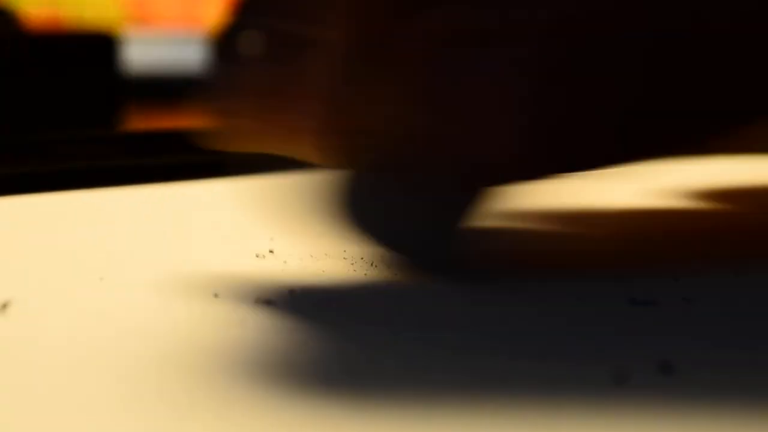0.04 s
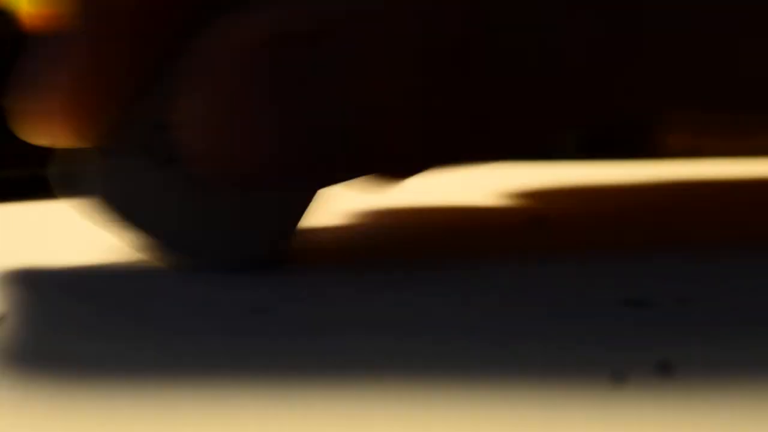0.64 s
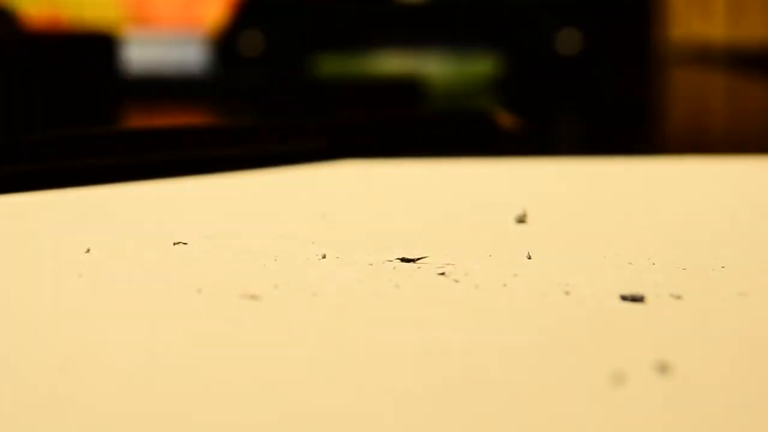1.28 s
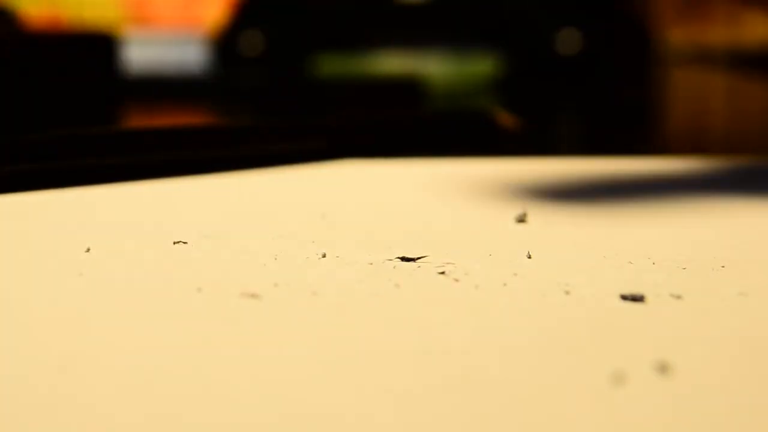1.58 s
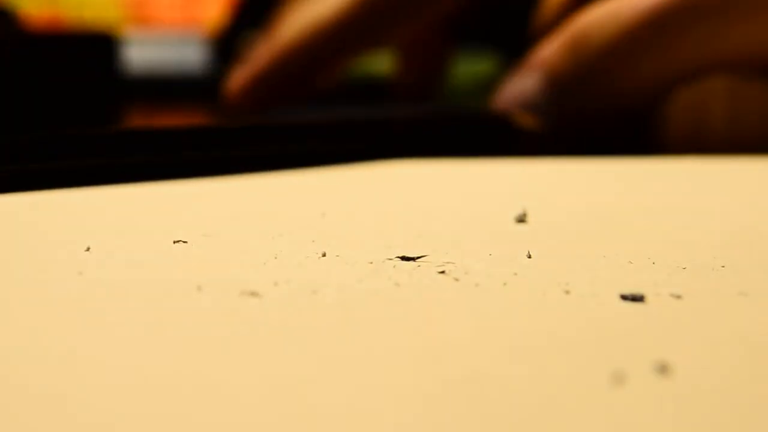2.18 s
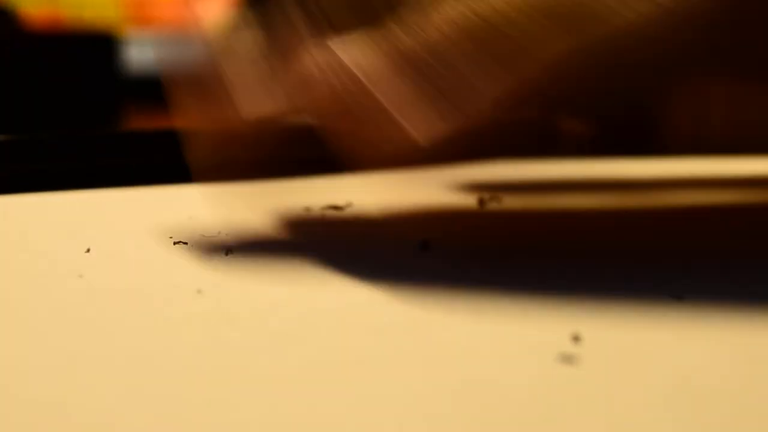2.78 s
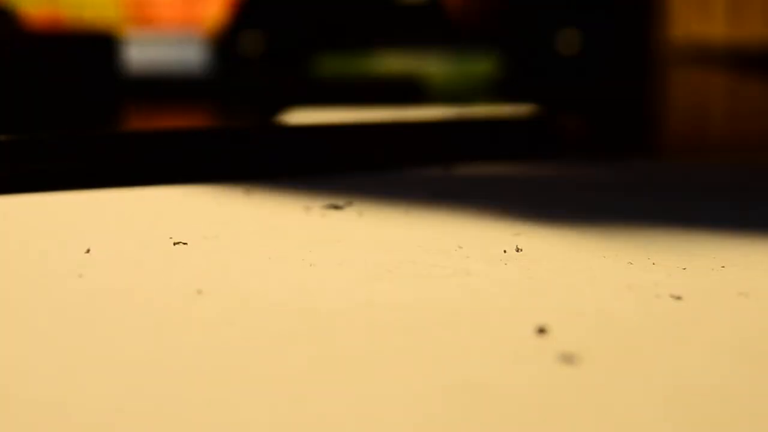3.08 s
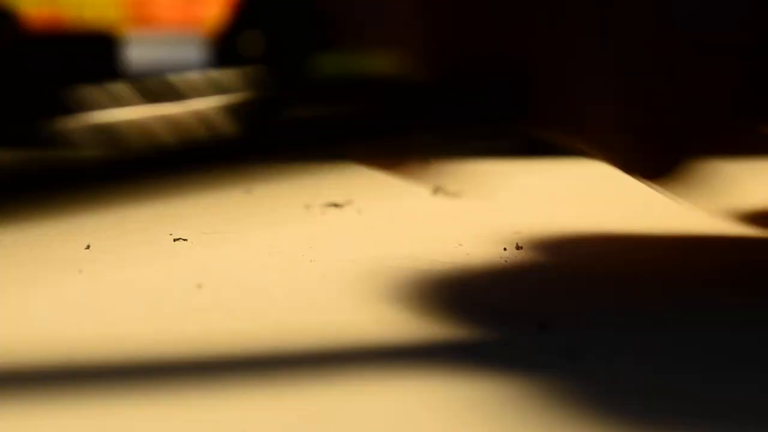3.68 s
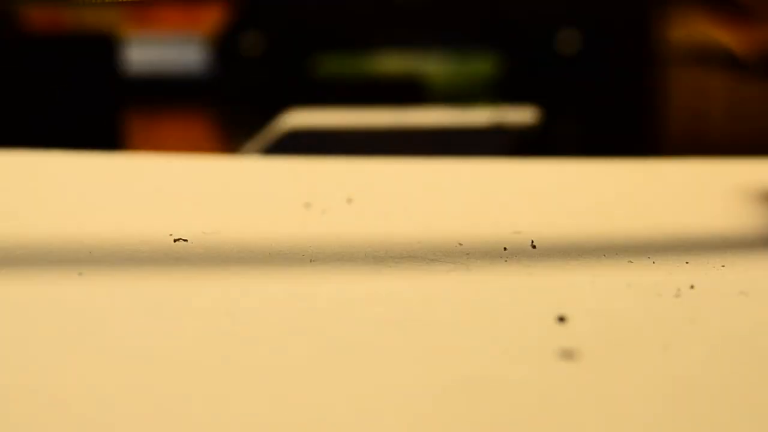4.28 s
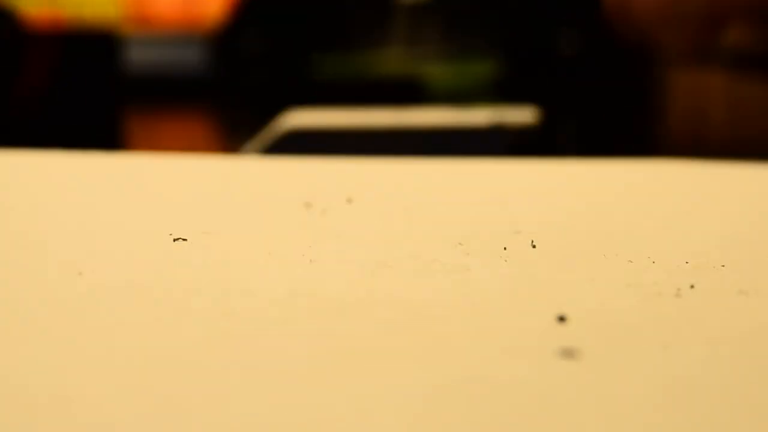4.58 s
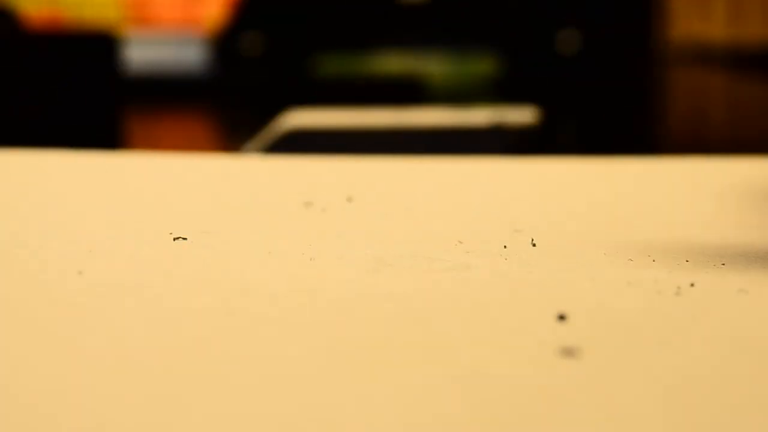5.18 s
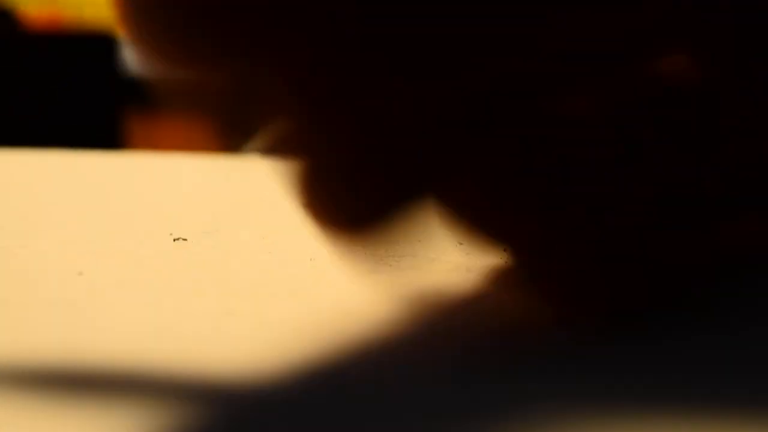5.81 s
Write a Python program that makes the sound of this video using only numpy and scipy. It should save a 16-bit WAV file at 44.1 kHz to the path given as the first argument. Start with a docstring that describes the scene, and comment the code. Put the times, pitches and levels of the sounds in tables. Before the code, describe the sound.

An eraser rubs paper and knocks down on a desk, a hand brushes the sheet, and a pencil scrapes and taps over a low hum.

```python
"""An eraser rubs a drawing pad, paper fibres snapping under it, and is put down with a knock on the desk.
A hand sweeps the crumbs away. A pencil rings faintly as it is lifted, scrapes over the paper
and drops in light taps that ring its wooden barrel. The stereo microphone lies close to the pad;
behind it all, a fan and a mains hum drone in the small furnished room."""
import sys
import numpy as np
from scipy import signal
from scipy.fft import rfft, irfft
from scipy.io import wavfile

SR = 44100
rng = np.random.default_rng(int(sys.argv[2]) if len(sys.argv) > 2 else 0)


def transcribe(signal):
    """Save signal, clipped to [-1, 1], as a 16-bit WAV file at the path in sys.argv[1]."""
    frames = np.atleast_2d(signal).T
    limited = np.clip(frames, -1, 1)
    pcm = np.round(limited * 32767).astype(np.int16)
    wavfile.write(sys.argv[1], SR, pcm)


N = 257984
TIME_S, BIN_HZ = np.arange(N) / SR, np.fft.rfftfreq(N, 1 / SR)


def gain_of(db):
    return 10 ** (np.asarray(db) / 20)


def unit_rms(x):
    return x / np.sqrt(np.mean(x ** 2) + 1e-20)


def curve_at(points, hz):
    """Join points by straight lines on a log frequency axis."""
    point_hz, values = np.transpose(points)
    return np.interp(np.log(hz + 1), np.log(point_hz + 1), values)


def add(mix, start_s, sound):
    part = mix[max(round(start_s * SR), 0):][:len(sound)]
    part += sound[:len(part)]


def coloured(x, spectrum):
    return irfft(rfft(x) * gain_of(curve_at(spectrum, BIN_HZ)), N)


def band(x, low_hz, high_hz):
    return irfft(rfft(x) * ((BIN_HZ >= low_hz) & (BIN_HZ < high_hz)), N)


def wander(rate_hz):
    """Random drift of rms 1."""
    return unit_rms(band(rng.standard_normal(N), 0.1, rate_hz))


def struck(modes, contact_hz, spread_s=0):
    """Ring of a struck body; a soft contact leaves the upper resonances unexcited."""
    ring_samples = 4096
    hz = np.fft.rfftfreq(2 * ring_samples, 1 / SR)
    power = sum(gain_of(db) ** 2 / (1 + ((hz - pitch) / width) ** 2) ** 2 for pitch, width, db in modes)
    power /= 1 + (hz / contact_hz) ** 4
    log_gain = np.log(power + 1e-9) / 2
    mirrored = np.concatenate([log_gain, log_gain[-2:0:-1]])
    causal_ring = np.exp(np.conj(signal.hilbert(mirrored)))[:len(hz)]
    # bending waves carry the treble faster than the bass; spread_s is the travel time at 1 kHz
    travel = np.exp(-4j * np.pi * spread_s * np.sqrt(1000 * hz))
    return irfft(causal_ring * travel)[:ring_samples]


# the room's decay: frequency_hz, t60_s
ROOM_DECAY = [(100, 0.21), (400, 0.17), (1000, 0.34), (3000, .24), (9000, 0.28), (16000, 0.095)]
# colour of its tail: frequency_hz, level_db
ROOM_COLOUR = [(100, -15.5), (450, 0), (1000, -15), (3000, -12.5), (9000, -10.5), (16000, -14)]
def room(x):
    """Diffuse tail of a small furnished room, each band dying at its own speed."""
    t = np.arange(SR // 2) / SR
    reflections = rng.standard_normal(len(t)) * np.clip((t - 0.003) / 0.0014, 0, 1)
    hz, age_s, bands = signal.stft(reflections, SR, nperseg=256)
    decay_rate = np.log(1000) / curve_at(ROOM_DECAY, hz)[:, None]
    bands *= np.exp(-decay_rate * age_s) * np.sqrt(2 * decay_rate / SR)
    bands *= gain_of(curve_at(ROOM_COLOUR, hz))[:, None]
    tail = signal.istft(bands, SR, nperseg=256)[1]
    return signal.fftconvolve(x, tail)[:N]


# echoes off things on the desk: delay_s, level_db
DESK_ECHOES = [(.0024, -17), (.0052, -20), (.0076, -15.5), (.0086, -17.5)]
def at_microphone(x, room_db):
    """The direct sound arrives with its first echoes and the room's tail."""
    heard = x + gain_of(room_db) * room(x)
    for delay_s, db in DESK_ECHOES:
        add(heard, delay_s, gain_of(db) * x)
    return heard


def tone(hz, db, waver):
    """A drone tone that wavers in level and phase."""
    phase = 2 * np.pi * hz * TIME_S + waver * wander(5)
    return np.sqrt(2) * gain_of(db + 1.7 * waver * wander(8)) * np.sin(phase)


# the fan's rush of air: frequency_hz, level_db
FAN_AIR = [(25, -13), (50, -8.5), (66, -14), (110, 0), (185, 2.5), (240, -9.5), (340, -1), (420, -6.5),
           (540, -4.5), (700, -10), (1300, -11.5), (3000, -21), (6000, -30), (16000, -33)]
# how much that rush differs between the two capsules: frequency_hz, side_db
AIR_WIDTH = [(60, -12), (130, -28.5), (290, -14), (640, -9), (1410, -5.5), (3100, -2), (6820, -4),
             (15000, -1.5)]
# the mains tone, then the fan's tones: pitch_hz, level_db
DRONE_TONES = [(120, -49.5), (181, -63.5), (193, -62), (343, -67), (1271, -78.5), (1352, -86), (1535, -78),
               (1561, -82)]
def fan_and_mains():
    """Air rushes from all round the room; hum, fan tones and a faint whine sit in the centre."""
    mid, side = (gain_of(-55 + 0.88 * wander(5.7)) * unit_rms(coloured(noise, FAN_AIR))
                 for noise in rng.standard_normal((2, N)))
    side = coloured(side, AIR_WIDTH)
    for k, (hz, db) in enumerate(DRONE_TONES):
        mid += tone(hz, db, waver=1.1 if k else 0.16)  # the mains is steadier than the fan
    whine_db = np.interp(TIME_S, [0, 3.0, 3.6], [-70, -67.5, -73.5])
    mid += tone(hz=1166, db=whine_db, waver=1.7)
    return np.array([mid + side, mid - side])


# small sharp clicks: start_s, level_db, pitch_hz, width_hz, room_send_db
CLICKS = [(0.1368, -12, 4300, 2040, 4), (2.1362, -10, 3800, 202, 8), (2.1595, -16, 8500, 5000, -22),
          (2.4947, -31.5, 6000, 7000, -11), (2.7975, -28, 4880, 6000, -6), (3.6735, -1, 8100, 1900, -12),
          (4.3334, -21.5, 7700, 7150, -5), (4.388, -24, 4000, 4000, -3), (4.864, -29, 10200, 3000, 9)]
def clicks():
    """Tiny hard contacts, some dry and close to the microphone, some further off."""
    near, far = np.zeros((2, N))
    for start_s, db, hz, width_hz, send_db in CLICKS:
        click = gain_of(db) * struck([(hz, width_hz, 0)], contact_hz=10000)
        add(near, start_s, click)
        add(far, start_s, gain_of(send_db) * click)
    return at_microphone(near, room_db=-4.5) + gain_of(4) * room(far)


# scrapes, squeaks and the lifted pencil's ring: middle_s, length_s, level_db, pitch_hz, width_hz
SWELLS = [(0.141, 0.022, -48, 3900, 1520), (0.656, 0.037, -48, 1780, 500), (0.66, 0.064, -59, 640, 270),
          (2.109, 0.02, -48.5, 1210, 450), (3.298, 0.058, -49.5, 3200, 320), (3.33, 0.15, -53, 3920, 504),
          (3.701, 0.078, -50, 1430, 250), (3.93, 0.66, -54, 890, 350), (4.052, 0.037, -45, 620, 400),
          (4.041, 0.074, -38.5, 3330, 2000), (4.061, 0.032, -40, 1270, 550),
          (4.469, 0.084, -35, 4000, 1420), (4.868, 0.059, -64.5, 4200, 250), (4.87, .04, -63, 10200, 1400)]
def resonant_swells(pulses_per_s=2500):
    """Each short swell is a stream of irregular little pulses ringing one resonance."""
    mix = np.zeros(N)
    for middle_s, length_s, db, hz, width_hz in SWELLS:
        swell = np.cos(np.pi * np.clip((TIME_S - middle_s) / length_s, -0.5, 0.5)) ** 2
        pulses = rng.standard_normal(N) * (rng.random(N) < pulses_per_s / SR)
        ring = signal.oaconvolve(pulses, struck([(hz, width_hz, 0)], contact_hz=14500))[:N]
        mix += gain_of(db) * unit_rms(ring) * swell
    return mix


# resonances of the pencil and of the pad under it: pitch_hz, width_hz, level_db
PENCIL_MODES = [(596, 180, -10.5), (1300, 78, 3), (1505, 88, 1), (1820, 78, 0.5), (2170, 110, -9),
                (2900, 280, -6), (3430, 110, -8.5), (4500, 860, -12), (6600, 550, -16), (7860, 450, -14.5),
                (9800, 690, -17), (13400, 2100, -23)]
PAD_THUD_MODES = [(195, 134, -1), (546, 120, -1.5), (1270, 200, -3)]
# the pencil tapping the pad as it is lifted (3.673 s) and set down: start_s, level_db, contact_cutoff_hz,
# relative_thud_db
PENCIL_TAPS = [(3.373, -3, 850, 6), (3.673, 8, 9000, 1), (4.0875, 19.5, 9350, -11), (4.5314, 12, 7500, -10)]
def pencil_taps():
    """The wooden barrel rings briefly over the dull thud of the pad."""
    taps = np.zeros(N)
    for start_s, db, contact_hz, thud_db in PENCIL_TAPS:
        thud = struck(PAD_THUD_MODES, contact_hz, spread_s=0.001153)
        barrel = struck(PENCIL_MODES, contact_hz, spread_s=0.0008)
        add(taps, start_s, gain_of(db) * (barrel + gain_of(thud_db) * thud))
    return at_microphone(taps, room_db=0)


# resonances of the desk top, its low boom and the pushed pad: pitch_hz, width_hz, level_db
DESK_MODES = [(353, 81, -4.5), (444, 25.6, 4), (585, 98, -6.5), (895, 150, -4.5), (1043, 123, 0.5),
              (1330, 130, -3.5), (1560, 98, -9), (1844, 270, -13), (2870, 680, -21.5), (3380, 500, -22),
              (9100, 2000, -32.5)]
BOOM_MODES = [(98, 24, 2), (127, 35, 1), (197.5, 14.5, 6)]
PAD_PUSH_MODES = [(44, 6, -5), (330, 510, -9)]
# eraser and hand knocking on the desk: start_s, level_db, contact_cutoff_hz, relative_boom_db
DESK_KNOCKS = [(2.0302, 22, 378, -2), (2.0372, 17.5, 298, 0.5), (2.1588, 30.5, 3870, -11),
               (2.251, 11, 503, -1.5), (2.257, 1, 700, 1)]
# soft pushes of the hand on the pad: start_s, level_db, contact_cutoff_hz
HAND_PUSHES = [(0.046, 2.5, 300), (0.3, 12.5, 150), (0.583, 7, 150), (0.597, 10.5, 280), (0.756, 11, 120),
               (0.79, 4, 120), (2.4596, 21, 133), (3.167, 23, 78), (4.41, 11, 99)]
def desk_knocks(boom_lag_s=0.0033):
    """Knocks ring the desk top, whose low boom follows; pushes stir only the pad and the boom."""
    knocks, booms = np.zeros((2, N))
    for start_s, db, contact_hz, boom_db in DESK_KNOCKS:
        add(knocks, start_s, gain_of(db) * struck(DESK_MODES, contact_hz, spread_s=0.000691))
        boom = struck(BOOM_MODES, contact_hz, spread_s=0.00039)
        add(booms, start_s + boom_lag_s, gain_of(db + boom_db) * boom)
    for start_s, db, contact_hz in HAND_PUSHES:
        push = struck(BOOM_MODES + PAD_PUSH_MODES, contact_hz, spread_s=0.00096)
        add(booms, start_s, -gain_of(db) * push)
    return at_microphone(knocks, room_db=-2.5) + at_microphone(booms, room_db=5.5)


def stroke_speed(start_s, rise_s, fall_s):
    """The hand gathers speed to 1 and slows to rest, a quarter sine each way."""
    ramp = np.interp(TIME_S, [start_s, start_s + rise_s, start_s + rise_s + fall_s], [0, 1, 0])
    return np.sin(np.pi / 2 * ramp)


def rubbing(strokes, colour, snaps_per_s, snap_spread_db, catch_db, drag_lag_s, hiss_power, drag_power):
    """Paper fibres snap under an unevenly catching contact; hiss and low drag grow as powers of speed."""
    snaps = rng.random(N) < snaps_per_s / SR
    sizes = gain_of(snap_spread_db * np.minimum(rng.exponential(1, N), 4)) * rng.standard_normal(N)
    catching = gain_of(catch_db * wander(120))
    grit = coloured(snaps * sizes * catching, colour)
    lows = signal.sosfiltfilt(signal.butter(2, 4500, fs=SR, output="sos"), grit)
    hiss = unit_rms(grit - lows)
    drag = lows / np.std(band(lows, 1500, 5000))
    mix = np.zeros(N)
    for start_s, rise_s, fall_s, db, drag_db in strokes:
        mix += gain_of(db) * stroke_speed(start_s, rise_s, fall_s) ** hiss_power * hiss
        lagging_speed = stroke_speed(start_s + drag_lag_s, rise_s, fall_s)
        mix += gain_of(db + drag_db) * lagging_speed ** drag_power * drag
    return mix


# wood on paper: frequency_hz, level_db
WOOD_FRICTION = [(180, -39), (300, 13), (392, -28), (462, -14), (667, 0), (749, 4), (856, -1.5), (1320, -3),
                 (1640, -7.5), (2930, 1.5), (4300, 0.5), (6300, -4.5), (9880, -0.5), (16000, -17.5)]
# slides of the pencil: start_s, rise_s, fall_s, hiss_db, relative_drag_db
PENCIL_SLIDES = [ (3.922, 0.047, .037, -55, -1.5), (3.989, 0.023, 0.064, -34, -7),
                 (4.38, 0.038, 0.041, -54.5, 3), (4.419, .032, 0.061, -39, -11), ]
def pencil_slides():
    """The hard barrel scrapes grainily over the paper."""
    return rubbing(PENCIL_SLIDES, WOOD_FRICTION, snaps_per_s=12000, snap_spread_db=1.8,
                   catch_db=2.5, drag_lag_s=0.0035, hiss_power=1.7, drag_power=1.03)


# skin on paper: frequency_hz, level_db
SKIN_FRICTION = [(200, -12), (700, -3), (1400, -11.5), (2200, -10.5), (3300, -4.5), (5500, -0.5), (8300, 4),
                 (11000, -1.5), (13000, -9), (16000, -11)]
# sweeps of the hand: start_s, rise_s, fall_s, hiss_db, relative_drag_db
HAND_SWEEPS = [ (2.497, 0.11, 0.036, -51.5, -4.5), (2.79, 0.022, 0.044, -54, -6),
               (2.858, 0.049, 0.042, -50, -6), (3.15, 0.067, .07, -73.5, 6), (3.28, 0.02, 0.069, -55, -2.5),
               (3.73, 0.086, 0.26, -62, 0), (5.57, 0.05, 0.1, -64, -1), (5.67, .04, 0.03, -67.5, -3),
               (5.793, 0.029, .028, -62.5, 3.5), ]
def hand_sweeps():
    """The side of the hand brushes the paper with a smooth, bright hiss."""
    return rubbing(HAND_SWEEPS, SKIN_FRICTION, snaps_per_s=16000, snap_spread_db=0,
                   catch_db=0.9, drag_lag_s=0.0018, hiss_power=1.55, drag_power=0.87)


# rubber on paper: frequency_hz, level_db
RUBBER_FRICTION = [(45, 27), (80, 19), (160, 18), (300, 7), (700, 11.5), (1700, 0), (3000, -1), (5500, -7),
                   (7300, -4), (9000, -0.5), (12000, -11.5), (16000, -19)]
# strokes of the eraser: start_s, rise_s, fall_s, hiss_db, relative_drag_db
ERASER_STROKES = [ (0.0, 0.033, 0.064, -65, 3), (0.135, 0.043, 0.067, -65.5, -0.5),
                  (0.262, .045, 0.065, -63, 1.5), (0.41, 0.044, 0.12, -66.5, -0.5),
                  (0.563, 0.039, 0.032, -63, 2), (0.635, 0.013, 0.034, -67, 11),
                  (0.695, 0.084, 0.062, -59, -5), (0.82, 0.023, .028, -61, -14), ]
def eraser():
    """Rubber drags over the paper in quick, dull strokes, close to the microphone."""
    return rubbing(ERASER_STROKES, RUBBER_FRICTION, snaps_per_s=7800, snap_spread_db=-0.5,
                   catch_db=1.5, drag_lag_s=0.002, hiss_power=1.34, drag_power=0.75)


def scene():
    """Close sounds sit near the centre; the two channels differ only faintly and diffusely."""
    close = desk_knocks() + pencil_taps() + clicks()
    handling = eraser() + hand_sweeps() + pencil_slides() + resonant_swells()
    close += at_microphone(handling, room_db=-12.5)
    side = gain_of(-19) * room(close)
    return np.array([close + side, close - side]) + fan_and_mains()


def record(dry):
    """The recorder: low cut, rounded overload on the hardest knock, faint hiss and a band limit."""
    low_cut = signal.sosfilt(signal.butter(4, 44, "high", fs=SR, output="sos"), dry)
    rounded = low_cut / (1 + low_cut ** 20) ** (1 / 20)
    hiss = gain_of(-80) * rng.standard_normal(dry.shape)
    band_limit = signal.firwin(511, 16050, window=("kaiser", 9), fs=SR)
    return signal.oaconvolve(rounded + hiss, band_limit[None], "same")


dry = scene()
out = record(dry)
transcribe(out)
```